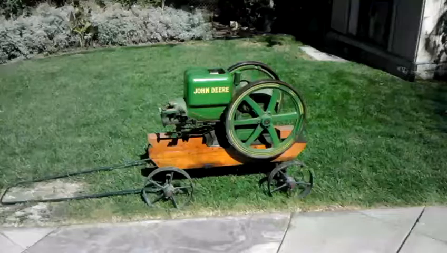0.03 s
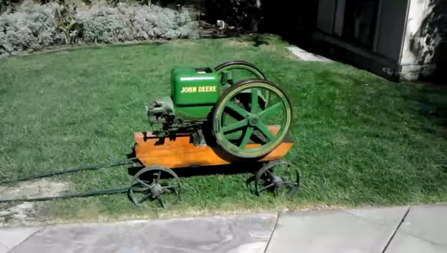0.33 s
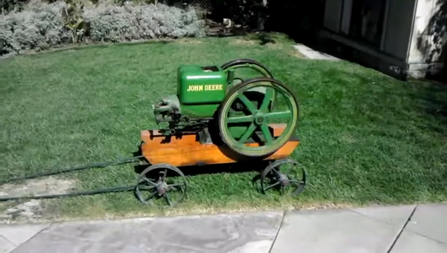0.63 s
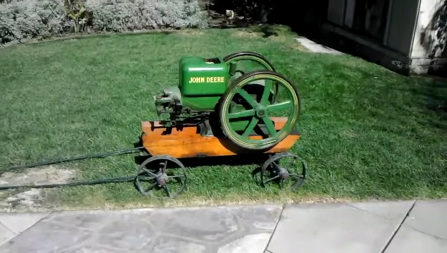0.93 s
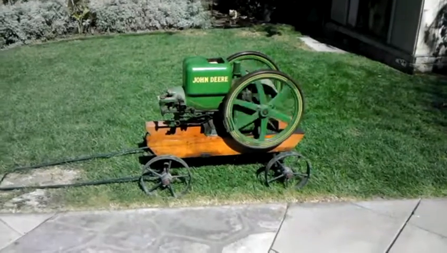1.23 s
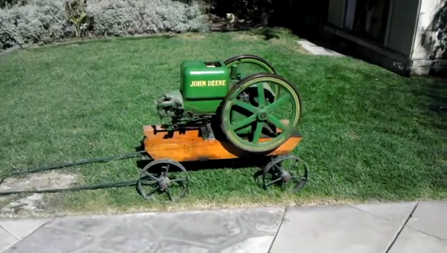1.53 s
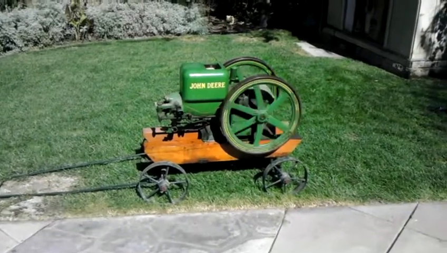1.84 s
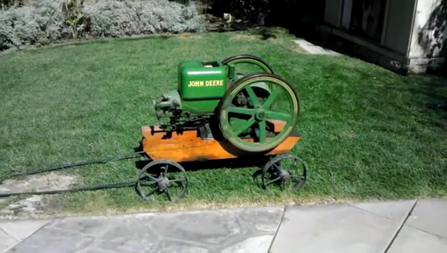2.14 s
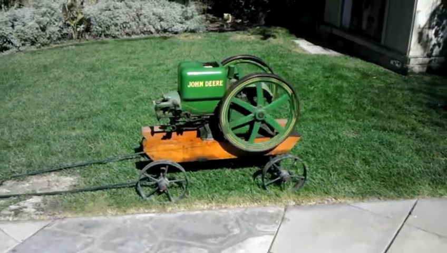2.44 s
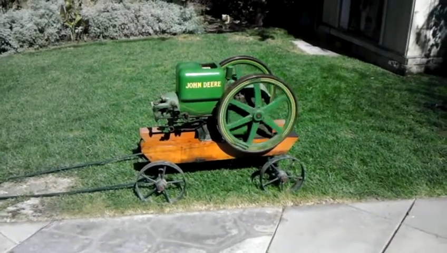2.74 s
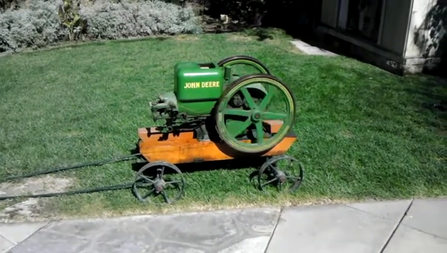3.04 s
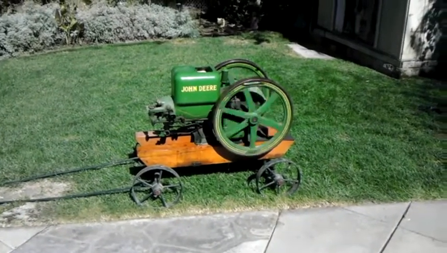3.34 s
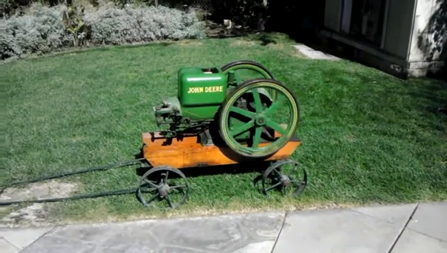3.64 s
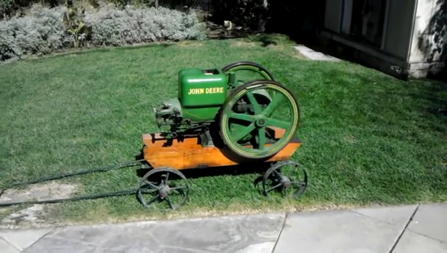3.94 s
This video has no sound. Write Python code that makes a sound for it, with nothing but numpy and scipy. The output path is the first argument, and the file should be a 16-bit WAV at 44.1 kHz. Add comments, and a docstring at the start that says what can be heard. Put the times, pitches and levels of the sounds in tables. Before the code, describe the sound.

An old stationary engine clatters along outdoors, firing twice with a sharp, loud pop.

```python
"""Gears clatter and loose iron rattles as a hit-and-miss engine coasts on a wooden cart on a lawn.
It turns about eight times a second, its piston pumping air out and in through the open exhaust valve.
Twice it fires: a snort as it breathes in, a hush as it squeezes the fuel and air, a knock as they
ignite, then the exhaust pop, so loud that the recorder turns itself down."""
import sys
import numpy as np
from scipy import signal
from scipy.fft import rfft, irfft
from scipy.io import wavfile

SR = 44100
rng = np.random.default_rng(int(sys.argv[2]) if len(sys.argv) > 2 else 0)


def int16_out(signal):
    """Quantize to a 16-bit WAV file."""
    q = np.round(np.clip(np.atleast_2d(signal).T, -1, 1) * 32767)
    wavfile.write(sys.argv[1], SR, q.astype(np.int16))


N = 176400
T = np.arange(N) / SR
FREQS = np.maximum(np.arange(N // 2 + 1) * SR / N, 1)

# The two firings. Each row: ignition time in seconds, knock level in dB, pop level in dB.
FIRINGS = [(1.6555,0.5,-0.5),(3.4354,2,0)]
# The tone of the gears and of the cart. Each row: frequency in Hz, level in dB.
GEAR_TONE = [(30,-39.5),(80,-25.5),(150,-5.5),(300,-1),(1200,-1),(2300,-7),(3300,-15.5),(4800,-14),(14000,-39.5)]
CART_TONE = [(25,-36),(55,-33),(95,-15.5),(135,-1),(200,4.5),(300,-5),(600,-38)]


def undb(db):
    """Turn decibels into a gain."""
    return 10 ** (np.asarray(db) / 20)


def unit(x):
    """Scale a sound to an average power of 1."""
    return x / np.sqrt(np.mean(x ** 2))


def gains(points):
    """Draw a gain curve through points of frequency and dB."""
    hz, db = np.array(points).T
    return undb(np.interp(np.log(FREQS), np.log(hz), db))


def colour(x, tone):
    """Give a sound this tone, with no ringing ahead of a hit; power 1."""
    cepstrum = irfft(np.log(gains(tone)))
    return unit(irfft(rfft(x) * np.exp(rfft(2 * cepstrum[:N // 2], N))))


def ring(x, modes):
    """Make a sound ring at a set of pitches; narrow ones ring longer. Power 1."""
    response = sum((-1) ** k * undb(db) / (1 + 1j * hz / width * (FREQS / hz - hz / FREQS))
                   for k, (hz, width, db) in enumerate(modes))
    return unit(irfft(rfft(x) * response))


def noise():
    """Plain white hiss."""
    return rng.standard_normal(N)


def clicks(per_s, scatter_db=0):
    """Tiny hits at random times; scatter_db makes their strength uneven."""
    return (rng.random(N) < per_s / SR) * np.sign(noise()) * undb(scatter_db * np.clip(noise(), -2, 2))


def smeared(x):
    """Each hit spreads through the iron for a millisecond or two."""
    spread = rfft(noise() * np.exp(-T / 0.001734))
    return irfft(rfft(x) * spread / np.abs(spread))


def swell(turn, rows, rest_db, cycle=2):
    """A level that swells at set places in a cycle of one or two turns."""
    power = 0
    for at, width, db in rows:
        distance = (turn - at + cycle / 2) % cycle - cycle / 2
        power += undb(db) ** 2 * np.exp(-.5 * (distance / width) ** 2)
    return np.sqrt(power + undb(rest_db) ** 2)


def burst(start, attack, hold, decay):
    """A level that rises, holds and dies away; all times in seconds."""
    return np.clip((T - start) / attack, 0, 1) * np.exp(-np.maximum(T - start - hold, 0) / decay)


def gears(turn, level):
    """Gear teeth strike each other in a dense clatter."""
    # Swells over two turns. Each row: place in turns, width in turns, level in dB.
    swells = [(.075,0.058,2),(.27,0.08,-2),(.53,0.089,-2.5),(.95,0.1,-4),(1.1,0.06,1.5),(1.33,0.063,0),(1.54,0.041,-1.5),(1.82,0.11,1)]
    teeth = level * swell(turn, swells, rest_db=-14) * clicks(per_s=2200, scatter_db=3)
    return undb(-22) * colour(smeared(teeth), GEAR_TONE)


def frame(turn, level):
    """Small hits keep the engine's frame ringing."""
    # The frame's notes. Each row: pitch in Hz, width in Hz, level in dB.
    modes = [(218,16,-10),(282,11.4,3.5),(307.6,17,-1),(368,8.5,-1.5),(424,8.7,-2),(489.5,16.6,-2),(973,18,-17),(1150,41,-8.5)]
    hits = level * swell(turn, [(.2, .35, 0)], rest_db=6.5) * clicks(per_s=900)
    return undb(-27.5) * ring(hits, modes)


def cart(turn, level):
    """The wooden cart shudders with a low rumble."""
    # Swells over two turns. Each row: place in turns, width in turns, level in dB.
    swells = [(.14,0.038,-2),(.34,0.036,2),(.53,0.23,-5),(.87,0.042,-3.5),(1.31,0.017,8.5),(1.52,0.022,1)]
    return undb(-35.5) * colour(level * swell(turn, swells, rest_db=-9) * noise(), CART_TONE)


def pumped_air(turn, level):
    """The piston pushes air out and pulls it back in once a turn."""
    # The tone of air going out and coming in. Each row: frequency in Hz, level in dB.
    out_tone = [(100,-35),(1000,2.5),(2400,10.5),(3500,-7.5),(4600,9.5),(6100,2),(6750,-3),(7400,-3),(12000,-5.5),(13500,-24.5)]
    in_tone = [(100,-40),(2000,4),(3400,-3),(4700,3.5),(6300,-4),(8500,-4.5),(12300,-12.5),(13500,-23)]
    outward = level * swell(turn, [(.005, .065, 0)], rest_db=-12, cycle=1) * noise()
    inward = level * swell(turn, [(.45, .125, 0)], rest_db=-7, cycle=1) * noise()
    return undb(-26.5) * colour(outward, out_tone) + undb(-33) * colour(inward, in_tone)


def loose_iron(turn, level):
    """Each loose part is struck on its own, so the pitch hops from hit to hit."""
    # Swells over two turns. Each row: place in turns, width in turns, level in dB.
    swells = [(.02,0.027,4),(.23,0.014,-5),(.335,0.017,2),(.5,0.03,-4),(.93,0.055,1.5),(1.05,0.029,2.5),(1.34,0.038,-1),(1.8,0.087,-1)]
    # The parts' notes. Each row: pitch in Hz, width in Hz, level in dB.
    modes = [(1884,40,2.5),(1987,58,2),(2087,46,0.5),(2420,350,-0.5),(5170,560,-21)]
    # The loudest clanks. Each row: start in seconds, level in dB.
    clank_times = [(.378,-1),(.566,1),(.584,0),(.669,1.5),(.842,0),(1.084,2.5),(1.222,1),(1.358,0),(1.878,0),(2.126,4),(2.281,2),(2.351,2),(2.492,2),(3.003,0),(3.134,2),(3.273,0),(3.651,3.5),(3.878,1.5)]
    # Their tone. Each row: frequency in Hz, level in dB.
    clank_tone = [(100,-18),(1600,-0.5),(2050,20),(3200,-23),(4900,-0.5),(14000,-33)]
    shake = level * swell(turn, swells, rest_db=-10)
    parts = sum(undb(db) * ring(shake * clicks(per_s=700), [(hz, width, 0)]) for hz, width, db in modes)
    clanks = sum(undb(db) * burst(at, 0.0013, 0.0059, 0.0039) for at, db in clank_times)
    return undb(-24.5) * unit(parts) + undb(-19.5) * clanks * colour(noise(), clank_tone)


def suction(turn, level):
    """Air drawn past the valve rings its passages; a thin whistle rises and falls with piston speed."""
    # The passages' notes. Each row: pitch in Hz, width in Hz, level in dB.
    modes = [(4680,300,-4),(5380,300,-4),(7720,400,-2),(9750,450,-3),(10250,400,-3)]
    fastest_turn, top_hz = .45, 6750
    speed = np.cos(2 * np.pi * (turn - fastest_turn))
    flow = level * swell(turn, [(fastest_turn, .085, 0)], rest_db=-11, cycle=1)
    hz = top_hz * (1 - .33 * (1 - speed))
    flutter = unit(signal.sosfilt(signal.butter(2, 110, fs=SR, output="sos"), noise()))
    whistle = level * np.sqrt(np.maximum(speed, 0)) * flutter * np.sin(2 * np.pi * np.cumsum(hz) / SR)
    return undb(-38) * ring(flow * noise(), modes) + undb(-40) * unit(whistle)


def coasting():
    """The running sounds follow the flywheel; the squeeze before each firing hushes them."""
    # Flywheel turns. Each row: middle of the outward stroke in seconds, rattle in dB, gears in dB.
    turns = [(-.04,0,-2),(0.083,2.5,3.5),(.21,4,4),(0.334,4.5,3.5),(0.458,2.5,5.5),(0.578,6,3.5),(.705,2.5,4),(0.835,4,3),(.961,5,3.5),(1.097,4,2.5),(1.223,5,3.5),(1.359,4.5,1.5),(1.495,3,1),(1.631,-15,5),(1.755,-7,2.5),(1.879,4.5,2),(1.997,2.5,5.5),(2.12,4,3.5),(2.239,6,1.5),(2.368,4,3),(2.489,8,3.5),(2.621,4,2.5),(2.745,5,3),(2.878,4,2.5),(3.008,3.5,3),(3.142,3,1.5),(3.277,6,3.5),(3.41,-25,5),(3.536,-5,2.5),(3.657,0.5,-2),(3.777,5.5,5.5),(3.897,5.5,2.5),(4.02,6,5)]
    times, rattle_db, gear_db = np.array(turns).T
    turn = np.interp(T, times, np.arange(len(times)))
    squeeze = sum(np.exp(-((T - at + 0.015) / 0.03) ** 2) for at, _, _ in FIRINGS)
    deep_hush, mild_hush = undb(-23.5 * squeeze), undb(-12 * squeeze)
    gear_level = undb(np.interp(T, times, gear_db)) * mild_hush
    rattle_level = undb(np.interp(T, times, rattle_db)) * deep_hush
    return (gears(turn, gear_level) + frame(turn, mild_hush) + cart(turn, mild_hush)
            + pumped_air(turn, deep_hush) + loose_iron(turn, rattle_level) + suction(turn, deep_hush))


def intake():
    """The intake valve flutters in two gulps and thumps shut after each."""
    # Gulps. Each row: seconds before ignition, length in seconds, level in dB.
    gulps = [(0.1198,0.013,1.5),(0.094,0.021,-3.5)]
    # Thumps. Each row: seconds before ignition, level in dB.
    thumps = [(.0955,0),(.071,1)]
    # The snort's tone. Each row: frequency in Hz, level in dB.
    snort_tone = [(30,-32),(200,11.5),(600,-23),(1300,5),(1850,10.5),(2400,5.5),(3800,-12.5),(4600,-3),(6000,0.5),(7500,-13),(12000,-3.5),(14000,-21)]
    thump_hz = 173
    snort, shudder, thump = 0, 0, 0
    for at, _, _ in FIRINGS:
        for lead, length, db in gulps:
            snort += undb(db) * burst(at - lead, 0.0012, length, 0.0073)
        for lead, db in thumps:
            shudder += undb(db) * burst(at - lead, 0.0028, 0.004, 0.021)
            note = np.sin(2 * np.pi * thump_hz * (T - at + lead))
            thump += undb(db) * burst(at - lead, 0.0026, 0.003, 0.003) * note
    flutter = colour(smeared(clicks(per_s=4000, scatter_db=0.5)), snort_tone)
    rumble = colour(noise(), CART_TONE)
    return undb(-11.5) * snort * flutter + undb(-21.5) * shudder * rumble + undb(-23) * thump


def ignition():
    """A sharp knock as the fuel fires; the gears clank and the cylinder booms on two low notes."""
    # The knock's tone. Each row: frequency in Hz, level in dB.
    knock_tone = [(30,-36),(500,9),(2000,-13),(12000,6.5),(14000,-1)]
    # Its ring. Each row: pitch in Hz, width in Hz, level in dB.
    knock_modes = [(2030,260,0),(4950,300,-3),(8060,400,-8)]
    # The cylinder's notes. Each row: pitch in Hz, fade time in seconds, level in dB.
    boom_modes = [(222,.028,-4),(298,.03,2.5)]
    knock = sum(undb(db) * burst(at, 0.001, 0.0038, 0.0047) for at, db, _ in FIRINGS)
    clank = sum(burst(at + 0.0085, 0.0031, 0.0024, 0.024) for at, _, _ in FIRINGS)
    boom = sum(undb(db) * burst(at + 0.015, 0.011, 0.018, decay) * np.sin(2 * np.pi * hz * (T - at))
               for at, _, _ in FIRINGS for hz, decay, db in boom_modes)
    crack = undb(-15.5) * colour(noise(), knock_tone) + undb(-10) * ring(noise(), knock_modes)
    return knock * crack + undb(-14) * clank * colour(noise(), GEAR_TONE) + undb(-16) * boom


def exhaust():
    """The exhaust valve opens with a pop, and the rest of the gas spits out."""
    # The tone of the pop and of the spit. Each row: frequency in Hz, level in dB.
    pop_tone = [(25,-17),(120,2),(300,5),(650,3),(1400,-3),(1950,13),(2800,-15),(5000,-0.5),(7000,-7),(11000,-5),(14000,-11)]
    spit_tone = [(200,-12),(2500,5.5),(5500,-6),(13000,-13)]
    lag_s, opening_s = 0.0567, 0.0051
    pop = sum(undb(db) * burst(at + lag_s - opening_s / 2, opening_s, 0.015, 0.0065)
              for at, _, db in FIRINGS)
    spit = sum(burst(at + lag_s, 0.0046, 0.028, 0.039) for at, _, _ in FIRINGS)
    return undb(1) * pop * colour(noise(), pop_tone) + undb(-12) * spit * colour(noise(), spit_tone)


def treble_colour():
    """A short random filter adds many fine, faintly ringing peaks to the highs."""
    # How strong the peaks are. Each row: frequency in Hz, level in dB against the plain sound.
    strength = [(3500,-28),(4600,-11),(11000,-7)]
    peaks = rfft(noise() * np.exp(-T / 0.015))
    share = gains(strength)
    return (1 + share * peaks / np.sqrt(np.mean(np.abs(peaks) ** 2))) / np.sqrt(1 + share ** 2)


def engine():
    """All the engine's sounds as one spectrum, with fresh noise on each call."""
    return rfft(coasting() + intake() + ignition() + exhaust()) * treble_colour()


def scene():
    """Paving and house walls scatter the sound into two microphones; the highs spread widest."""
    # Stereo width. Each row: frequency in Hz, side level minus middle level in dB.
    width = [(60,-14),(200,-17.5),(500,-15),(1000,-10),(2000,-8),(4000,-4),(8000,-1.5),(14000,-2)]
    # Stereo balance. Each row: frequency in Hz, left level minus right level in dB.
    balance = [(100,-1.9),(500,-1.1),(1000,-.7),(4500,-.3),(7800,-5),(13000,-2)]
    direct, diffuse = engine(), engine()
    scatter = rfft(noise() * np.exp(-T / 0.0051))
    side = (direct * scatter / np.abs(scatter) + diffuse) * gains(width) / np.sqrt(2)
    echo_shape = burst(0.038, 0.0036, 0.0087, 0.11 / np.log(1000))  # fades 60 dB in 0.11 seconds
    channels = []
    for sign in (1, -1):  # left, right
        echo = undb(-20) * rfft(unit(noise() * echo_shape)) / np.sqrt(N)
        heard = direct * (1 + echo) + sign * side
        channels.append(irfft(heard * gains(balance) ** (sign / 2)))
    return np.array(channels)


def record(dry):
    """The recorder starts, turns itself down on loud peaks, recovers slowly, clips and cuts the top."""
    start_s, attack_s, limit_db, recover_db_per_s, top_hz = 0.11, 0.0059, -6, 18, 14100
    pole = np.exp(-1 / (attack_s * SR))
    power = signal.lfilter([1 - pole], [1, -pole], np.mean(dry ** 2, axis=0))
    over_db = np.maximum(10 * np.log10(np.maximum(power, 1e-12)) - limit_db, 0)
    duck_db = np.maximum.accumulate(over_db + recover_db_per_s * T) - recover_db_per_s * T
    sound = np.clip(dry * undb(-duck_db), -1, 1) * (T > start_s)
    return signal.sosfilt(signal.ellip(10, .2, 70, top_hz, fs=SR, output="sos"), sound)


dry = scene()
out = record(dry)
int16_out(out)
```